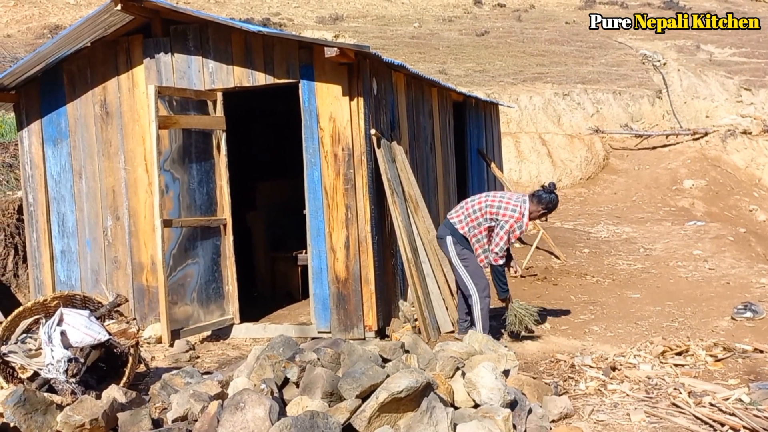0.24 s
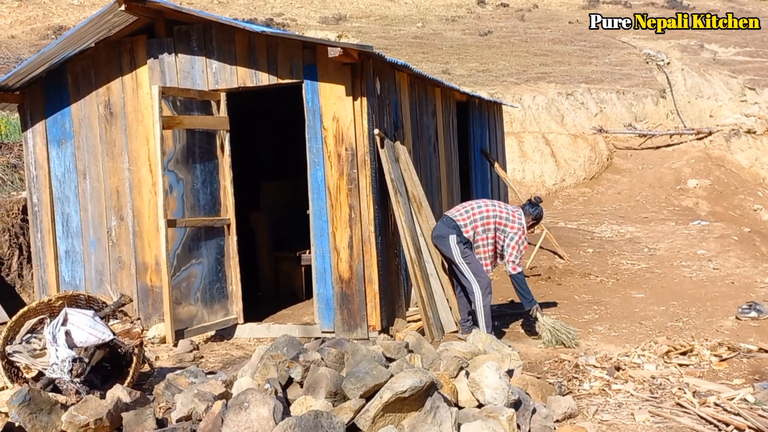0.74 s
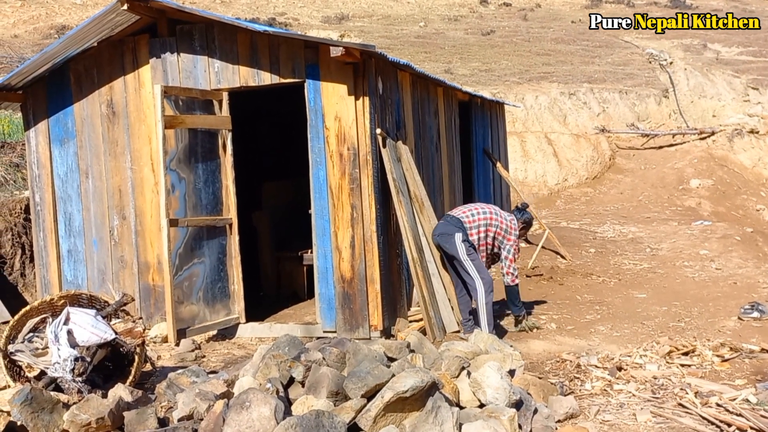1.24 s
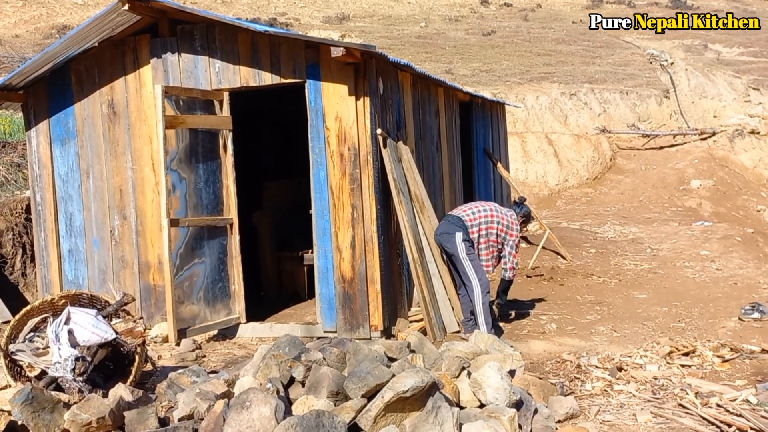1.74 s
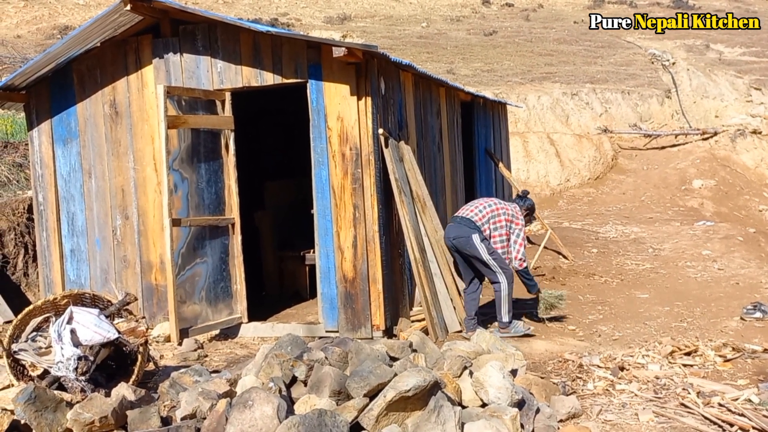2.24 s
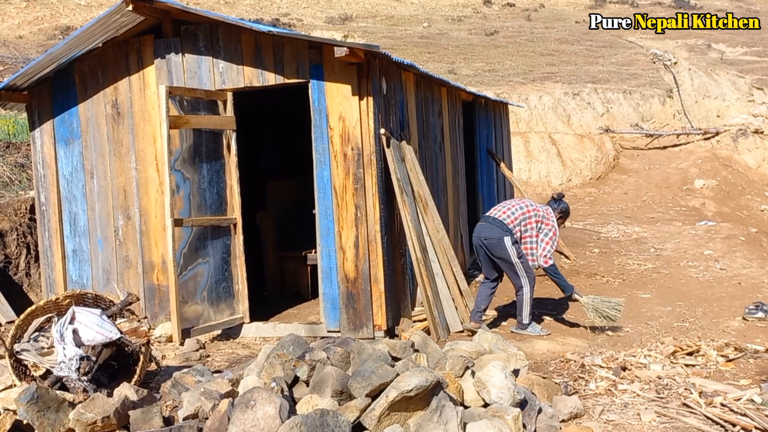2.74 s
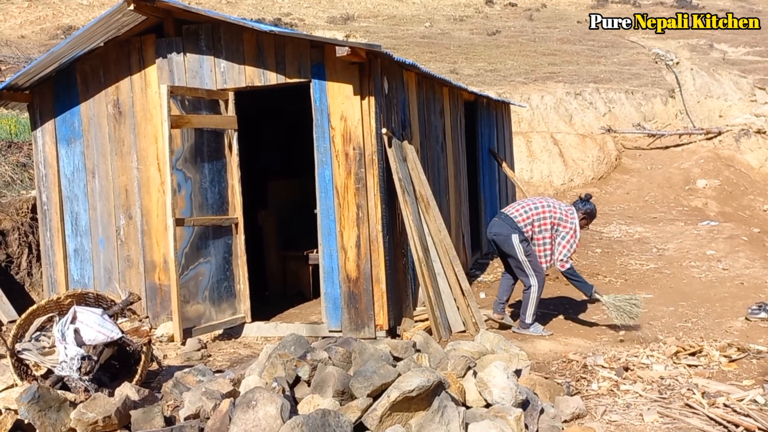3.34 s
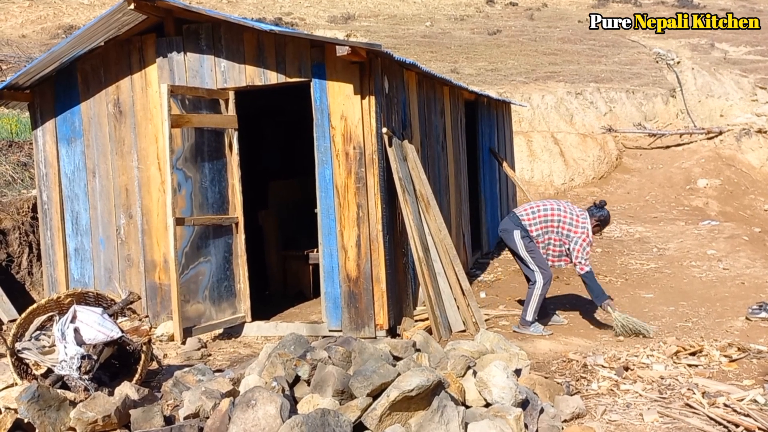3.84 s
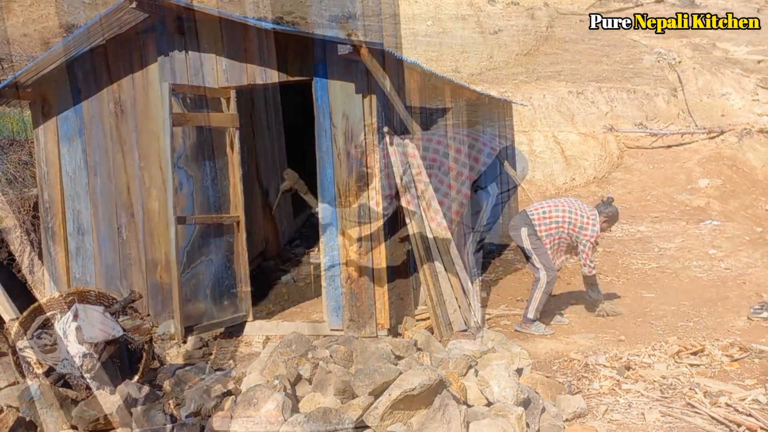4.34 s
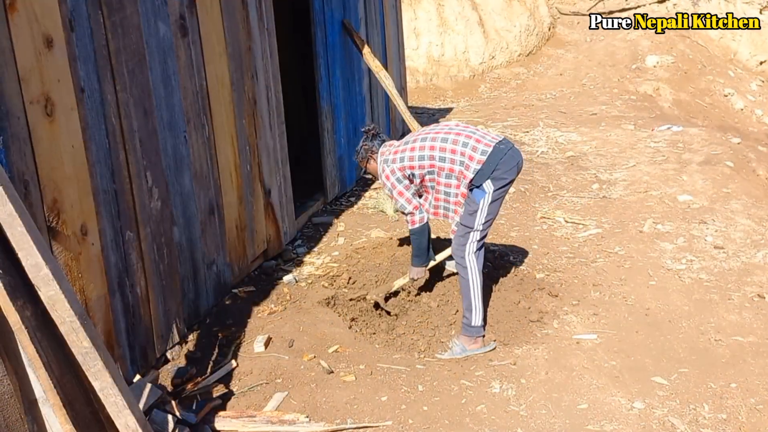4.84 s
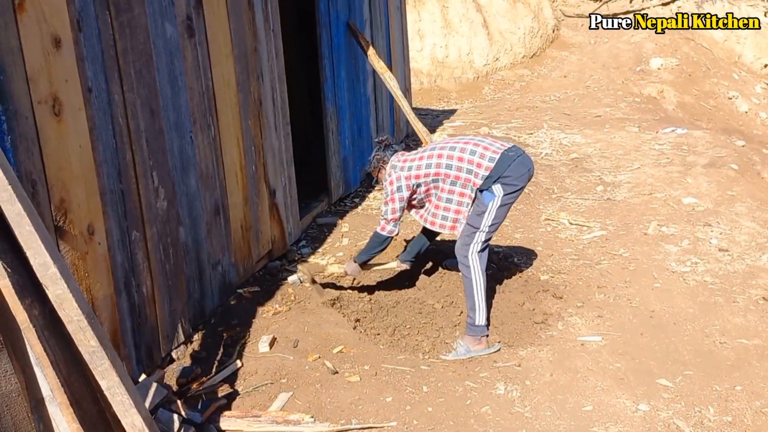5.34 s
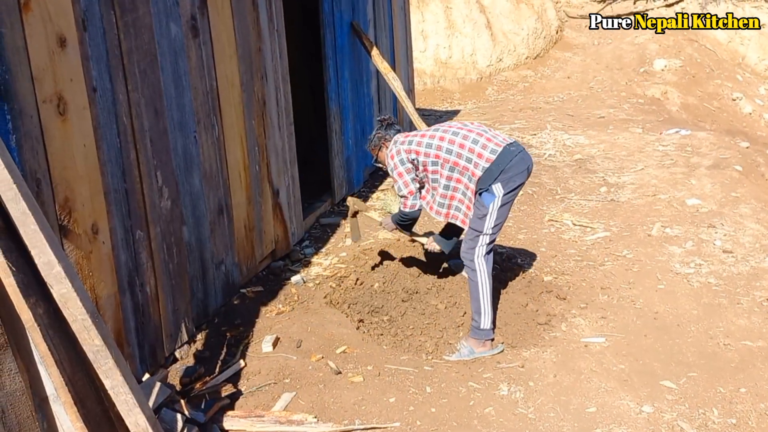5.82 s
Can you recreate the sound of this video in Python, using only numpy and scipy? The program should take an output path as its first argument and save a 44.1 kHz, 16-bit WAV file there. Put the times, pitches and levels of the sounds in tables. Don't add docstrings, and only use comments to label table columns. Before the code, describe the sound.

A wooden-handled tool clatters onto stones, then a grass broom sweeps gritty dry ground in scratchy strokes before a hoe chops hard earth.

```python
import sys
import numpy as np
from scipy import signal
from scipy.fft import rfft, irfft, next_fast_len
from scipy.io import wavfile
from scipy.ndimage import uniform_filter1d, map_coordinates

SR = 44100
rng = np.random.default_rng(int(sys.argv[2]) if len(sys.argv) > 2 else 0)


def bounce(signal):
    frames = np.transpose(np.atleast_2d(signal))
    limited = np.clip(frames, -1, 1)
    pcm = np.round(limited * 32767).astype(np.int16)
    wavfile.write(sys.argv[1], SR, pcm)


def rack_gain(trim_db):
    fader = np.asarray(trim_db, float)
    return 10 ** (fader / 20)


N = 268128

# (time [s], level [dB])
AIR = [
    (0, -52.5),
    (4.4, -51),
    (4.55, -45),
    (5.0, -53),
    (5.35, -47),
    (5.7, -49),
    (6.08, -51.5),
]
# (frequency [Hz], density [dB per Hz])
AIR_COLOUR = [(120, -4), (200, -3.5), (316, -5), (401, -4), (732, -5.5), (1520, -8), (2450, -12.5),
              (4160, -14.5), (6450, -19), (8490, -26), (14400, -17), (15800, -22)]
# (frequency [Hz], likeness [-1 to 1])
AIR_ALIKE = [(60, -0.61), (240, 0.5), (950, -0.037), (3770, -0.019), (15000, -0.0039)]

# (time [s], click peak [dB], low knock [dB], middle knock [dB], high knock [dB])
PEBBLES = [(0.0885, -38, -51, -30, -31.5), (1.5619, -34, -37, -55, -58), (1.5723, -23, -51, -50, -39),
           (1.6427, -23, -34.5, -36, -47), (1.6912, -15.5, -45, -53, -62), (1.9594, -35, -36, -51, -49),
           (2.43, -39, -58, -41, -49), (3.3194, -26, -37, -46, -59), (3.4202, -22.5, -36, -35, -31.5),
           (3.6614, -29, -56, -37, -35), (4.1899, -31, -32.5, -41, -47), (4.2375, -18.5, -47, -46, -38)]
# (frequency [Hz], level [dB], t60 [s])
STONE = [(2380, 3, 0.0051), (3070, -4, 0.0048), (3340, -1, 0.0075), (3940, -2, 0.0076)]
PEBBLE_GRIT_DB, PEBBLE_SKID = -10, 2500

# (time [s], held [s], level [dB])
LOADS = [
    (0.28, .03, -58),
    (0.332, 0.069, -43),
    (0.46, 0.2, -40),
    (0.71, 0.0076, -31.5),
    (0.81, .01, -33.5),
    (0.87, 0.057, -27),
    (1.54, 0.029, -59),
    (3.09, 0.0079, -54),
]
LAND, SETTLE = 430, 115
STROKE_HUM_DB, REST_DB = -21, -63

# (time [s], crack peak [dB], handle [dB], plank [dB], blade [dB])
BOUNCES = [(0.3260, 0, -17, -26, -9.5), (0.3788, -12, -43, -28, -39), (0.383, 5, -27.5, -10, -15),
           (0.416, -30, -31, -2, -18), (0.4234, -18, -29, -15, -17.5), (0.3972, -26, -43, -28, -22),
           (0.4047, -32, -36, -31, -30), (0.4333, -20, -34, -27, -24), (0.4485, -19, -44, -31, -28),
           (0.4582, -11.5, -25, -9.5, -9.5), (0.4827, -43, -36, -22, -43), (0.497, -18, -42, -21.5, -29),
           (0.517, -64, -28.5, -27, -31), (0.5712, -27, -23, -20.5, -39), (0.5751, -29, -22.5, -16, -37),
           (0.6325, -29, -33.5, -31, -41), (0.667, -24, -38.5, -32.5, -35), (0.7001, -30, -30.5, -30, -35),
           (0.7516, -34, -27, -30.5, -54), (0.7746, -36, -37, -34, -45), (0.8023, -33, -28, -32.5, -46),
           (0.8551, -32, -19.5, -15.5, -48), (0.8663, -21, -7, -19, -18.5), (0.8824, -20, -16.5, -29, -26),
           (0.9283, -23, -12, -15.5, -23.5), (0.9445, -39.5, -31, -23, -47), (0.9705, -40, -36, -30, -51),
           (1.0549, -33, -23, -34.5, -25.5), (1.1054, -55, -31.5, -44.5, -65)]
# (frequency [Hz], level [dB], t60 [s])
THUD = [(116.6, 4.5, 0.12), (144.5, 2.5, 0.11), (189, 3.5, 0.08), (264, 4, 0.061)]
# (frequency [Hz], level [dB], t60 [s])
FLAT_THUD = [(140, 0, 0.096), (209, -5, 0.031), (272, 6, 0.081), (350, -4, 0.12)]
# (frequency [Hz], level [dB], t60 [s])
HANDLE = [(595, 0.5, 0.047), (659, 8, 0.036), (703, -6, 0.037)]
# (frequency [Hz], level [dB], t60 [s])
PLANK = [(1160, -21, 0.02), (1114, -1, 0.025), (1244, 2, 0.017), (1297, -20, 0.012), (1750, -6, 0.018),
         (2110, -10.5, 0.0095)]
# (frequency [Hz], level [dB], t60 [s])
BLADE = [(2300, -12.5, 0.021), (2720, -33, 0.025), (2990, -20, 0.019), (3100, -16.5, 0.03),
         (3437, 9, 0.028), (3540, 4, 0.021), (4170, -10, 0.038), (5330, -8, 0.012), (7130, -8, 0.014),
         (9700, -18.5, 0.016)]
# (frequency [Hz], density [dB per Hz])
DRAG_COLOUR = [(100, -32), (180, 2), (400, -9.5), (700, -2), (1200, -11), (2000, -9.5), (2800, -16),
               (3500, -5), (4500, -16), (8000, -24.5), (15800, -26)]
# (frequency [Hz], likeness [-1 to 1])
TOOL_ALIKE = [(60, 0.32), (150, 1), (380, 0.97), (950, 0.86), (2380, 0.17), (5980, 1), (15000, 0.37)]
# (frequency [Hz], left over right [dB])
TOOL_PAN = [(60, -3), (180, -0.5), (550, -4), (1650, 1), (4970, -3.5), (15000, -8)]
THUD_DB, FLAT_THUD_DB, LIES_FLAT_S = 3, -8, 0.8
DRAG_DB, DRAG_GROWS, DRAG_HOLD_S, DRAG_FALL = -26.5, 0.61, 0.0074, 147
SING_DB, SINGS_S = 17.5, (0.55, 0.94)
CHATTER_DB, CHATTERS_S = 22, (0.37, 0.452)

# (frequency [Hz], t60 [s])
WALL_T60 = [(200, 0.23), (2000, 0.27), (10000, 0.1)]
# (frequency [Hz], level [dB])
WALL_COLOUR = [(100, -1), (600, -3.5), (2000, 5.5), (12000, -1)]

# (full pressure from [s], held [s], hiss [dB], grit [dB], suddenness [factor])
STROKES = [(0.69, 0.22, -42.5, -48.5, 2), (1.3, 0.054, -42, -52, 0.95), (1.42, 0.061, -38, -46, 0.98),
           (1.685, 0.0097, -46, -50.5, 1.5), (1.923, 0.2, -35.5, -43, 1.75), (2.33, 0.054, -51.5, -71, 1.8),
           (2.435, 0.075, -43.5, -54.5, 11), (2.588, 0.11, -32.5, -38.5, 1.4),
           (2.79, 0.1, -41.5, -43.5, 2.8), (3.088, 0.033, -39, -49, 2.2), (3.14, 0.16, -34.5, -38, 1.05),
           (3.359, 0.058, -39.5, -43.5, 2.8), (3.72, 0.11, -36.5, -40, 1.7),
           (3.88, 0.076, -33.5, -37.5, 0.8), (4.08, 0.047, -41, -39.5, 0.62), (4.33, 0.069, -44, -50, 2.9),
           (4.43, 0.12, -35, -41, 4.5)]
# (frequency [Hz], density [dB per Hz])
BRISTLES = [(1470, -26), (2500, -9), (2920, -32), (3510, -0.5), (3820, -3), (4130, 0.5), (4420, -0.5),
            (5320, -1.5), (6920, 1.5), (7650, -3.5), (9790, -6), (14900, -2.5), (15800, -8.5)]
# (frequency [Hz], density [dB per Hz])
GRIT = [(88, -38), (150, -10), (238, -3), (372, -6.5), (568, -1), (743, -3), (948, -10), (1120, -2),
        (1580, -8.5), (1870, -4), (2350, -4.5), (2890, -1.5), (3200, 1), (4160, -10), (7040, -120)]
# (frequency [Hz], likeness [-1 to 1])
BROOM_ALIKE = [(60, -0.99), (270, 0.63), (740, 0.78), (1220, 0.095), (2010, 0.081), (2600, -0.33),
               (2950, -0.71), (3400, -0.52), (4500, -0.43), (5500, -0.13), (7000, 0.049), (9080, -0.0045),
               (15000, -0.12)]
# (frequency [Hz], left over right [dB])
BROOM_PAN = [(60, -14), (180, -5), (550, 0.5), (1650, -1.5), (4970, 0.5), (15000, -4.5)]
PRESS, LIFT, GRIT_PRESS, GRIT_LIFT = 114, 78.4, 91, 48.6
SWEEP_ENDS_S = 4.49
SHADED_HZ, SHADE, TURNS_S = (5200, 9600), 0.34, (1.8, 3.1)

# (time [s], peak [dB], pitch [Hz])
TICKS = [(0.7218, -25, 12200), (1.8637, -33, 3460), (2.3441, -32, 6800), (2.6, -23, 7030),
         (2.8417, -24, 6770), (2.918, -25, 7280), (2.9543, -31, 3470), (3.0121, -32, 5520),
         (3.4059, -26, 3460), (3.597, -36, 7150), (3.611, -34, 7210), (3.647, -35, 4060),
         (4.0466, -19.5, 4280), (4.3121, -34, 6800), (4.363, -20, 12700)]

# (middle [s], lowest pitch [Hz], level [dB], left over right [dB])
PIPES = [
    (0.954, 4143, -32, -12),
    (4.135, 4152, -23.5, -10),
]
# (time from middle [s], pitch over lowest [Hz], level [dB])
PIPE_SHAPE = [
    (-.085, 183, -21),
    (-.07, 127, -20),
    (-.018, 5, 0.5),
    (.015, 8.8, 0.5),
    (.04, 65, -9),
    (.055, 47, -21),
    (.09, 42, -38),
]
# (start [s], length [s], pitch from [Hz], pitch to [Hz], level [dB])
CROONS = [
    (1.16, 0.068, 1080, 1050, -60),
    (1.81, 0.084, 817, 925, -60),
    (2.07, 0.206, 1130, 1150, -61),
    (2.89, 0.078, 982, 1090, -55.5),
]
# (start [s], length [s], pitch from [Hz], pitch to [Hz], level [dB])
SQUAWKS = [
    (4.23, 0.183, 2078, 2120, -47.5),
]

# (time [s], held [s], level [dB], left over right [dB])
GUSTS = [(4.252, 0.0083, -40.5, 34), (4.295, 0.017, -32.5, 29), (4.35, 0.062, -47, 15),
         (4.453, 0.037, -26.5, 7), (4.529, 0.061, -27.5, 4), (4.619, 0.058, -27, -3),
         (4.719, 0.13, -39.5, -3.5), (4.948, 0.036, -32.5, 18), (5.019, 0.035, -36, 2),
         (5.1, 0.12, -56.5, -1), (5.3, 0.056, -31.5, 0.5), (5.383, 0.1, -25, 20), (5.52, 0.024, -34.5, 11),
         (5.582, 0.015, -20, 23), (5.65, 0.21, -52, 2), (6.009, 0.028, -44.5, 12)]
# (frequency [Hz], density [dB per Hz])
RUMBLE = [(15, -52), (25, -14), (53, -1.5), (85, 2), (102, 0), (172, -19), (303, -29.5), (361, -40),
          (500, -37), (650, -35), (1100, -120)]

# (time [s], crack peak [dB], thud [dB], shaft [dB], thud pitch [Hz])
BITES = [
    (4.422, -14.5, -15, -46, 209),
    (4.4349, -7, -7, -15, 137),
    (4.4742, -26.5, -33, -35, 149),
    (5.2825, -21, -29, -17.5, 278),
    (5.2861, -18.5, -26, -22, 251),
    (5.2908, -30, -34, -31, 250),
    (5.296, -29, -26.5, -23, 115),
    (5.3119, -19.5, -39, -24, 111),
    (5.3213, -55, -29, -22, 212),
]
# (multiple of the thud pitch [ratio], level [dB], t60 [s])
EARTH = [(1, 10, 0.039), (1.7, -12, 0.026)]
# (frequency [Hz], level [dB], t60 [s])
SHAFT = [(600, 2, 0.034), (678, -3, 0.023), (910, 2, 0.011)]
# (frequency [Hz], level [dB], t60 [s])
HOE_BLADE = [(1605, 2, 0.035), (2600, 0, 0.032), (4610, 14, 0.018), (5700, 6, .012), (6600, -1, .012),
             (11500, -22, 0.0089)]
# (frequency [Hz], density [dB per Hz])
SPRAY = [(200, -32), (450, -1), (700, 0), (1200, -5), (2500, -11.5), (4500, -8), (7500, -15), (15800, -28)]
HOE_BLADE_DB = -10

# (frequency [Hz], gain [dB])
MICROPHONE = [(20, -40), (40, -16), (60, 1), (90, -0.5), (15500, 0), (15800, -33), (16700, -52)]


def unit(x):
    return x / np.sqrt(np.mean(x ** 2) + 1e-20)


def along(points, hz):
    f, v = np.transpose(points)
    return np.interp(np.log(hz + 1), np.log(f + 1), v)


def curves(rows):
    s, *cols = np.transpose(rows)
    t = np.arange(N) / SR
    gate = np.clip(np.minimum(t - s[0], s[-1] - t) / 0.005, 0, 1)
    return [np.interp(t, s, c) for c in cols] + [gate]


def wobble(rate):
    knots = rng.standard_normal(int(N * rate / SR) + 4)
    return map_coordinates(knots, [np.arange(N) * rate / SR])


def swell(s, held, db, rise, fall):
    t = np.arange(0, N, 32) / SR
    s, held, db, rise, fall = np.broadcast_arrays(s, held, db, rise, fall)
    before = rise[:, None] * np.maximum(s[:, None] - t, 0)
    after = fall[:, None] * np.maximum(t - (s + held)[:, None], 0)
    gain = np.linalg.norm(rack_gain(db[:, None] - before - after), axis=0)
    return np.interp(np.arange(N) / SR, t, gain)


def filtered(x, response):
    m = next_fast_len(N + 8192)
    return irfft(rfft(x, m) * response(np.fft.rfftfreq(m, 1 / SR)), m)[..., :N]


def spread(pair, alike, pan=((100, 0),)):
    m = next_fast_len(N + 8192)
    hz = np.fft.rfftfreq(m, 1 / SR)
    turn = np.arccos(np.clip(along(alike, hz), -1, 1)) / 2
    mid, side = rfft(pair, m) * [np.cos(turn), np.sin(turn)]
    tilt = rack_gain(along(pan, hz) / 2)
    return irfft(np.array([(mid + side) * tilt, (mid - side) / tilt]), m)[:, :N]


def turned(x, low_hz=90, lag_hz=1500):
    def response(hz):
        bass_cut = (1j * hz / (low_hz + 1j * hz)) ** 2
        lag = (lag_hz - 1j * hz) / (lag_hz + 1j * hz)
        return bass_cut * np.array([1 + 0 * hz, lag])
    return filtered(x, response)


def rush(spectrum, patchy_db, grain_db):
    z = signal.stft(rng.standard_normal((2, N)), nperseg=512)[2]
    field = uniform_filter1d(rng.standard_normal(z.shape[1:]), size=6, axis=0)
    field = uniform_filter1d(field, size=8, axis=1)
    pair = signal.istft(z * rack_gain(patchy_db * unit(field)), nperseg=512)[1][:, :N]
    grains = np.minimum(rng.exponential(size=N // 40 + 1), 5)
    grains = np.repeat(grains, 40)[:N]
    return unit(filtered(pair * rack_gain(grain_db * grains), lambda hz: rack_gain(along(spectrum, hz))))


def steady(x):
    return x / np.sqrt(np.abs(uniform_filter1d(x ** 2, size=900, axis=1)) + 0.077)


def ring(modes, cycles, scale=1, scatter_db=3, attack=0.0018, detune=0.032):
    t, chance = cycles / scale, rng.standard_normal((len(modes), 2))
    x = 0
    for (hz, db, t60), (a, b) in zip(modes, chance):
        fade = rack_gain(db + scatter_db * a - 60 * t / t60)
        x = x + fade * np.sin(2 * np.pi * hz * (1 + detune * b) * cycles)
    x = x * (1 - np.exp(-t / attack))
    return x / np.max(np.abs(x))


def crack(db, t, t60):
    noise = signal.lfilter([1, 0.35], [1, -0.3], rng.standard_normal(len(t)))
    return noise * rack_gain(db - 3.0 - 60 * t / t60)


def place(track, s, sound):
    track[..., round(s * SR):][..., :sound.shape[-1]] += sound


def wall(x):
    hz, t, z = signal.stft(rng.standard_normal((2, SR // 4)), SR, nperseg=256)
    fade_db = along(WALL_COLOUR, hz)[:, None] - 60 * t / along(WALL_T60, hz)[:, None]
    tail = signal.istft(z * rack_gain(fade_db), SR, nperseg=256)[1]
    return signal.oaconvolve(x[None], tail / np.linalg.norm(tail[0]), axes=1)[:, :N]


def air():
    level_db = curves(AIR)[0] + 4.0
    return rack_gain(level_db) * spread(rush(AIR_COLOUR, patchy_db=1.5, grain_db=1.05), AIR_ALIKE)


def pebbles():
    out, t = np.zeros(N + SR), np.arange(SR // 8) / SR
    for s, click_db, low_db, middle_db, high_db in PEBBLES:
        knock = rack_gain(low_db + 0.5) * ring(HANDLE, t * 1.266)
        knock = knock + rack_gain(middle_db - 0.5) * ring(PLANK, t * 1.24)
        knock = knock + rack_gain(high_db + 8.5) * ring(STONE, t)
        click = np.gradient(crack(click_db - 7.5, t, t60=0.011))
        place(out, s, click + knock)
    return out[:N]


def ground_rumble():
    s, held, hiss_db = np.transpose(STROKES)[:3]
    shake = swell(*np.transpose(LOADS), LAND, SETTLE) + rack_gain(REST_DB)
    shake = shake + swell(s, held, hiss_db + STROKE_HUM_DB, PRESS, LIFT)
    colour = [(25, -43), (55, -16.5), (100, 1.0), (170, -3.0), (300, -11.5), (500, -45.5)]
    return shake * spread(steady(rush(colour, patchy_db=4.5, grain_db=1.5)), [(60, 1.0), (150, 1.0)])


def blade_modes(s):
    sings = SINGS_S[0] < s < SINGS_S[1]
    chatters = CHATTERS_S[0] < s < CHATTERS_S[1]
    return [(hz, db + SING_DB * (k == 6 and sings) + CHATTER_DB * (k in (2, 3) and chatters), t60)
            for k, (hz, db, t60) in enumerate(BLADE)]


def bounces():
    out, t = np.zeros(N + SR), np.arange(SR // 8) / SR
    for s, crack_db, handle_db, plank_db, blade_db in BOUNCES:
        parts = [(HANDLE, handle_db + 5.0), (PLANK, plank_db + 3.5), (blade_modes(s), blade_db + 5.5)]
        body = sum(rack_gain(db) * ring(modes, t, detune=0.0073, scatter_db=5.5) for modes, db in parts)
        ground, over_db = (THUD, THUD_DB) if s < LIES_FLAT_S else (FLAT_THUD, FLAT_THUD_DB)
        thud = rack_gain(handle_db + over_db) * ring(ground, t, detune=0.03, scatter_db=3.5)
        place(out, s, crack(crack_db - 3.5, t, t60=0.0071) + body + thud)
    return out[:N]


def dragged_grit():
    s, crack_db, _, plank_db, _ = np.transpose(BOUNCES)
    contact_db = np.maximum(crack_db, plank_db - 11)
    after = swell(s + 0.0034, DRAG_HOLD_S, DRAG_DB + DRAG_GROWS * contact_db, rise=9700, fall=DRAG_FALL)
    return after * rack_gain(2 * wobble(60)) * rush(DRAG_COLOUR, patchy_db=2.5, grain_db=3)


def clatter():
    knocks = pebbles() + bounces()
    return spread(turned(knocks) + dragged_grit(), TOOL_ALIKE, TOOL_PAN) + rack_gain(-12.5) * wall(knocks)


def broom():
    t = np.arange(N) / SR
    s, held, hiss_db, grit_db, sudden = np.transpose(STROKES)
    catch = wobble(24.67)
    lean = 0.6 * unit(uniform_filter1d(catch, size=3500))
    pressure = swell(s, held, hiss_db, PRESS * sudden, LIFT * sudden)
    tips = pressure * rack_gain(4.0 + 0.76 * catch + lean) * rush(BRISTLES, patchy_db=2.0, grain_db=1.7)
    hidden = SHADE * np.interp(t, TURNS_S, [1, 0])
    tips = tips - hidden * filtered(tips, lambda hz: (hz > SHADED_HZ[0]) & (hz < SHADED_HZ[1]))

    kick_s, _, kick_db = np.transpose(PEBBLES)[:3]
    rolling = swell(s, held, grit_db, GRIT_PRESS * sudden, GRIT_LIFT * sudden)
    rolling = rolling + swell(kick_s, 0.0064, kick_db + PEBBLE_GRIT_DB, PEBBLE_SKID, PEBBLE_SKID)
    grit = rolling * rack_gain(1.5 + 1.0 * catch) * rush(GRIT, patchy_db=2.5, grain_db=0.44)
    gate = np.clip((SWEEP_ENDS_S - t) / 0.0014, 0, 1)
    return spread(gate * (tips + grit), BROOM_ALIKE, BROOM_PAN)


def stems():
    out, t = np.zeros((2, N + SR)), np.arange(300) / SR
    for s, db, hz in TICKS:
        noise = np.gradient(rng.standard_normal((2, len(t))), axis=1)
        tone = np.sin(2 * np.pi * hz * t) * rack_gain(6.5)
        place(out, s, rack_gain(db - 3 - 60 * t / 0.008) * (noise + 0.5 * tone * [[1], [0]]))
    return spread(out[:, :N], [(3000, 0.3), (12000, 0.26)], BROOM_PAN)


def whistle(calls, partials, jitter):
    out, waver = np.zeros((2, N)), 1 + jitter * wobble(80)
    for call in calls:
        span = slice(int(call[0][0] * SR), int(call[-1][0] * SR))
        hz, db, pan_db, gate = [c[span] for c in curves(call)]
        phase = 2 * np.pi * np.cumsum(hz * waver[span]) / SR
        tone = sum(rack_gain(level) * np.sin(k * phase) for k, level in partials)
        out[:, span] += np.sqrt(2) * gate * rack_gain(db + pan_db * [[0.5], [-0.5]]) * tone
    return out


def glides(calls, pan_db, early):
    return [[(s, hz_from, db - 5, pan_db),
             (s + 0.465 * length, hz_from + early * (hz_to - hz_from), db - 0.8, pan_db),
             (s + 0.88 * length, hz_to, db, pan_db),
             (s + length, hz_to, db - 9, pan_db)]
            for s, length, hz_from, hz_to, db in calls]


def birds():
    calls = [[(s + u, hz + bend, db + shape_db, pan) for u, bend, shape_db in PIPE_SHAPE]
             for s, hz, db, pan in PIPES]
    pipe = whistle(calls, [(1, 0)], jitter=0.0025)
    croon = whistle(glides(CROONS, pan_db=4.0, early=0.57), [(1, 6.0), (2, -23)], jitter=0.0093)
    squawk_partials = [(1, -1), (0.56, -11), (1.25, -7.5)]
    squawk = whistle(glides(SQUAWKS, pan_db=-17.5, early=-0.73), squawk_partials, jitter=0.0055)
    return pipe + croon + squawk + rack_gain(-12) * wall(pipe[1])


def wind():
    s, held, db, pan_db = np.transpose(GUSTS)
    ports = np.array([swell(s, held, db + 3.5 + np.minimum(side * pan_db, 0), rise=1400, fall=800)
                      for side in (1, -1)])
    return rack_gain(4.0) * ports * steady(spread(rush(RUMBLE, patchy_db=4.0, grain_db=-0.5), [(60, 0.46)]))


def hoe():
    out, soil, t = np.zeros(N + SR), np.zeros(N + SR), np.arange(SR // 6) / SR
    for s, crack_db, thud_db, shaft_db, thud_hz in BITES:
        thud = -rack_gain(thud_db + 3.0) * ring(EARTH, t * thud_hz, scale=thud_hz, attack=0.0029)
        place(out, s + 0.002, thud)
        place(out, s, rack_gain(shaft_db - 2.5) * ring(SHAFT, t))
        place(out, s, rack_gain(crack_db + HOE_BLADE_DB) * ring(HOE_BLADE, t, scatter_db=8.0, detune=0.031))
        crumble = rack_gain(crack_db - 9.0 - 60 * t / 0.03)
        trickle = rack_gain(crack_db - 12.5 - 60 * t / 0.056)
        place(soil, s, crumble + trickle)
    spray = soil[:N] * rush(SPRAY, patchy_db=2.5, grain_db=2.5)
    near = out[:N] * rack_gain([[2.1], [-2.1]]) + spread(spray, [(300, 0.98), (8000, 0.075)])
    return near + rack_gain(-12) * wall(out[:N] + spray[0])


def scene():
    return air() + ground_rumble() + clatter() + broom() + stems() + birds() + wind() + hoe()


def band_limit(x):
    return signal.sosfilt(signal.butter(12, 16400, fs=SR, output="sos"), x)


def record(dry):
    overloaded = dry / (1 + np.abs(dry / 0.9) ** 6) ** (1 / 6)
    mix = filtered(overloaded, lambda hz: rack_gain(along(MICROPHONE, hz)))
    return band_limit(mix)


dry = scene()
out = record(dry)
bounce(out)
```